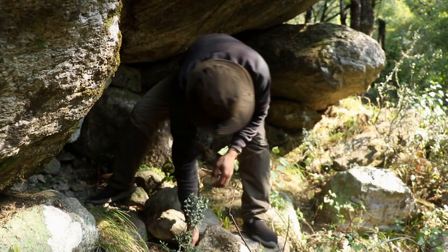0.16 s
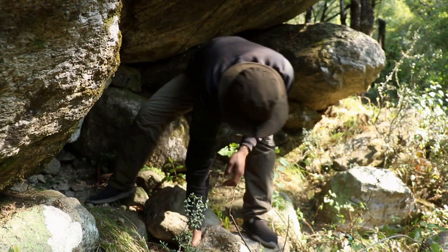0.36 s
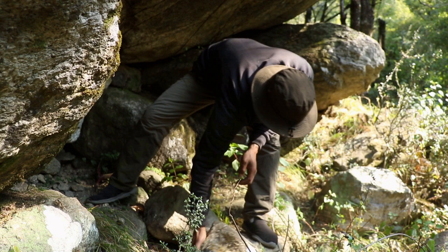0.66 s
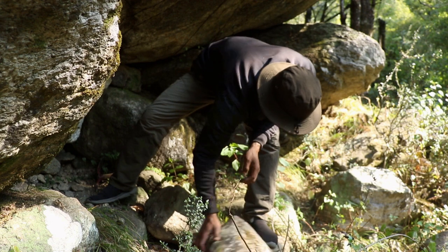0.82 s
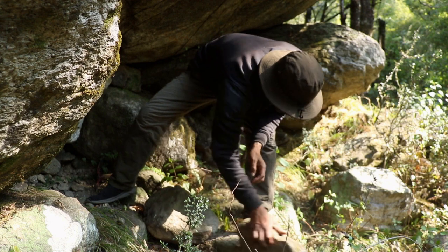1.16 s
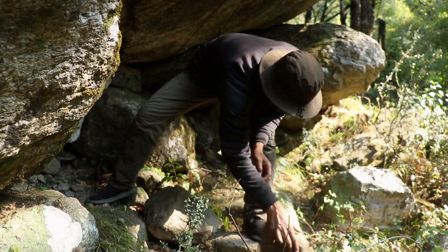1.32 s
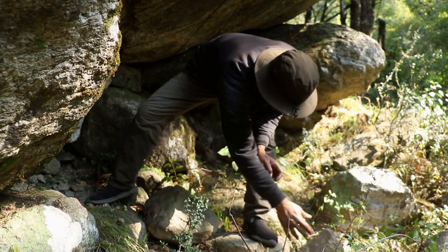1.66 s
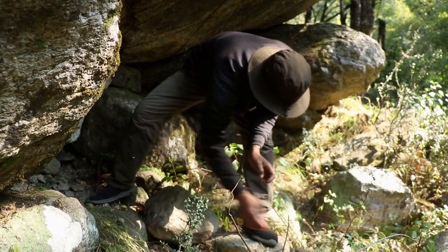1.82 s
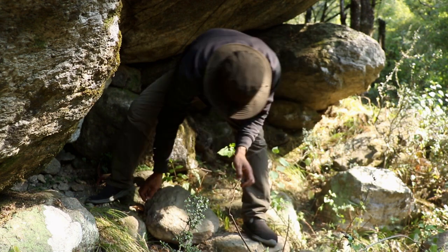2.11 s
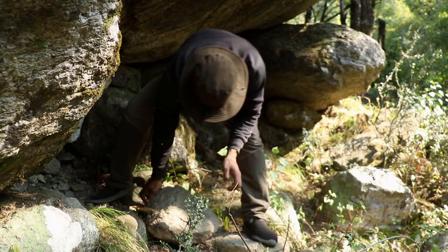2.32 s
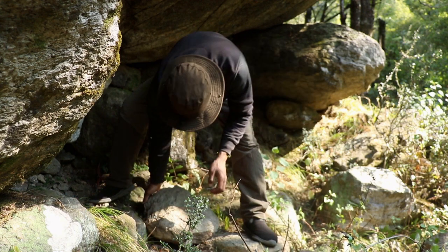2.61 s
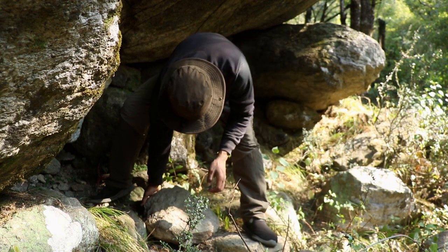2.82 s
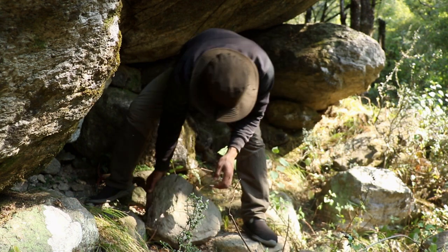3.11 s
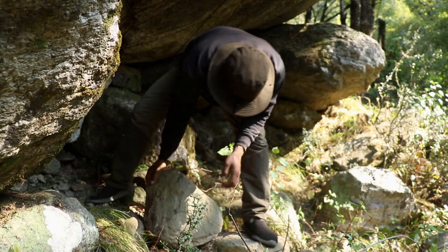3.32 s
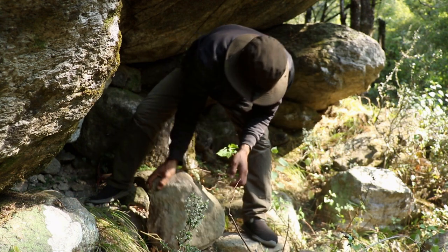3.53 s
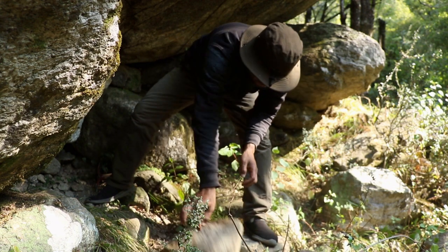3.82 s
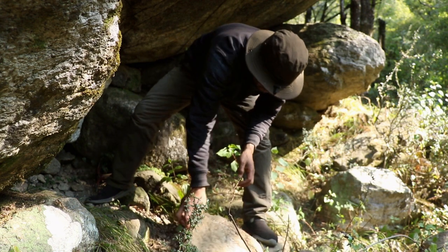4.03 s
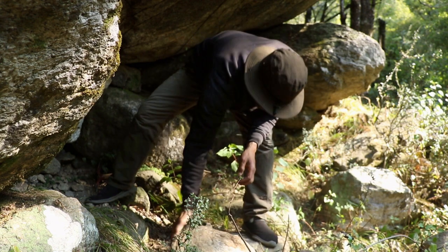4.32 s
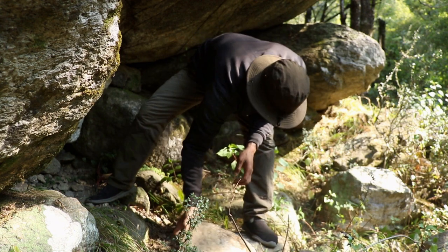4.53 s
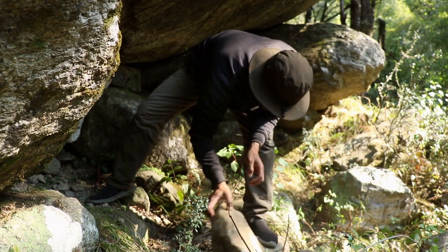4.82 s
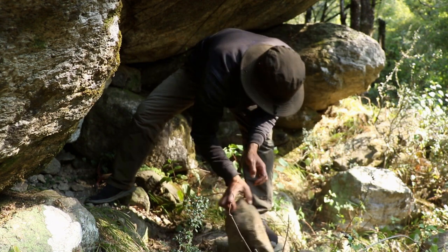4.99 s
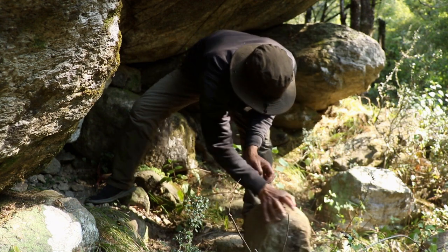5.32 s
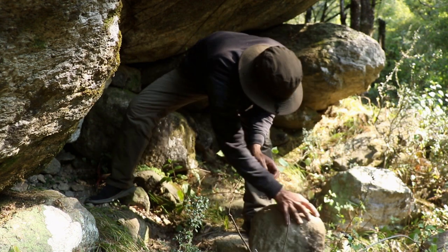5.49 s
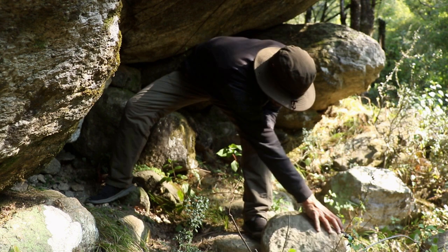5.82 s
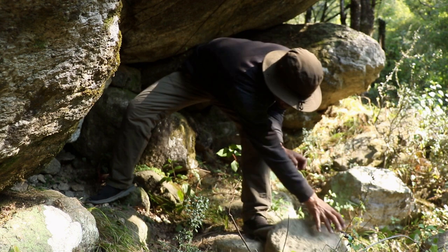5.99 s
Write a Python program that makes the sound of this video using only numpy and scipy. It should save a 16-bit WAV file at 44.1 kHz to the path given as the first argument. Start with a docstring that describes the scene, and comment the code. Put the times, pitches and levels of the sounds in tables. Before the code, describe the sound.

Heavy stones knock, clack and scrape as hands toss and roll them over dry leaves and grit, with twig snaps and one hard stone strike midway.

```python
"""First a faint woodland hush and a few dry twig snaps, then heavy stones are pulled, tossed and rolled by hand.
Each knock layers a dull filtered thud, a hard clack and a low shake of the soil, with noise scattered off boulders.
Small stones ring as they clink, friction impacts make skids, and twigs snap as sharp taps with a splintering tail.
Leaves, grit and a rolling weight are crackling noise that follows the effort of the hands; the sound is mono."""
import sys
import numpy as np
from scipy import signal
from scipy.fft import rfft, irfft, next_fast_len
from scipy.io import wavfile
from scipy.ndimage import uniform_filter1d

SR = 44100
rng = np.random.default_rng(int(sys.argv[2]) if len(sys.argv) > 2 else 0)


def transcribe(signal):
    """Save signal, clipped to [-1, 1], as a 16-bit WAV file at the path in sys.argv[1]."""
    frames = np.atleast_2d(signal).T
    limited = np.clip(frames, -1, 1)
    pcm = np.round(limited * 32767).astype(np.int16)
    wavfile.write(sys.argv[1], SR, pcm)


N = 271215  # samples in the scene
T = np.arange(N) / SR
AGE = np.arange(SR // 4) / SR  # time since a contact began, in s; each contact sound stops at 0.25 s
TAP = (AGE == 0) * 1.0  # single-sample impact


def undb(db):
    """Decibels to gain."""
    return 10 ** (np.asarray(db) / 20)


def unit(x):
    """Scale to rms 1."""
    return x / np.sqrt(np.mean(x ** 2))


def peak(x):
    """Scale to a peak of 1."""
    return x / np.abs(x).max()


def held(x, length_s):
    """Give a burst the energy of an rms-1 sound lasting length_s."""
    return x * np.sqrt(length_s * SR) / np.linalg.norm(x)


def fade(t60_s):
    """Exponential decay over one contact, reaching -60 dB at t60_s."""
    return np.exp(-np.log(1000) * AGE / t60_s)


def band(x, lo_hz, hi_hz, order=2):
    """Causal band-pass, with its edges kept in a workable range."""
    hi_hz = np.clip(hi_hz, 60, 0.47 * SR)
    lo_hz = min(lo_hz, 0.9 * hi_hz)
    sos = signal.butter(order, [lo_hz, hi_hz], "band", fs=SR, output="sos")
    return signal.sosfilt(sos, x)


def colour(x, points):
    """Shape a long sound with a curve of (Hz, dB) points, at rms 1."""
    hz, db = np.transpose(points)
    size = next_fast_len(N, True)
    bins_hz = np.maximum(np.fft.rfftfreq(size, 1 / SR), 1)
    gain = undb(np.interp(np.log(bins_hz), np.log(hz), db))
    return unit(irfft(rfft(x, size) * gain, size)[:N])


def ring(modes):
    """Free ringing of (Hz, dB, t60 s) modes, with unit energy."""
    y = sum(undb(db) * fade(t60_s) * np.cos(2 * np.pi * hz * AGE) for hz, db, t60_s in modes)
    return y / np.linalg.norm(y)


def scatter(t60_s, db):
    """Dense short reflections off the rocks around: noise that swells quickly, then decays."""
    y = rng.standard_normal(len(AGE)) * fade(t60_s) * (1 - fade(0.0098))
    return undb(db) * y / np.linalg.norm(y)


def grains(per_s, spread_db, size):
    """Tiny fractures at random moments: many weak, a few strong."""
    strength = undb(spread_db * np.minimum(rng.exponential(size=size), 4.5))
    breaks = rng.random(size) < per_s / SR
    return unit(breaks * strength * rng.choice([-1, 1], size))


def walk(rate_hz):
    """Random levels drawn rate_hz times a second and joined by slopes."""
    k = max(int(SR / rate_hz), 1)
    steps = np.repeat(rng.standard_normal(N // k + 1), k)
    return uniform_filter1d(steps, k)[:N]


def add(track, start_s, sound):
    """Mix a sound into the track at start_s."""
    i = max(int(start_s * SR), 0)
    track[i:i + len(sound)] += sound[:N - i]


def slide(length_s, rise_s, release_s, per_s):
    """Rough faces catch and slip: dense impacts that die away once the stone stops."""
    onset = 1 - np.exp(-AGE / rise_s)
    release = np.exp(-np.maximum(AGE - length_s, 0) / release_s)
    return onset * release * grains(per_s, 2.0, size=len(AGE))


# Heavy stone knocks; the two pitches set the filter edges in knocks()
# start_s, thud_level_db, thud_pitch_hz, soil_level_db, clack_level_db, clack_pitch_hz
STONE_KNOCKS = [(1.008, -40, 280, -35.5, -59, 1500), (1.076, -27, 310, -41.5, -41, 1200),
                (1.274, -39.5, 260, -56, -36, 1500), (1.644, -25.5, 467, -44.5, -22, 3970),
                (1.658, -29.5, 476, -54, -38, 3000), (1.798, -18, 323, -24.5, -16, 1130),
                (1.811, -22.5, 383, -45, -50, 1200), (1.869, -31.5, 259, -31, -54, 1200),
                (1.917, -27.5, 420, -46, -23.5, 2220), (1.927, -23.5, 243, -62, -18.5, 1200),
                (2.028, -21.5, 680, -62, -29, 1300), (2.202, -14, 324, -32, -39, 1300),
                (2.214, -23, 397, -56, -26.5, 1460), (3.065, -45.5, 283, -52.5, -49, 2000),
                (3.617, -47.5, 237, -47.5, -52, 1500), (3.714, -46, 247, -54, -65, 1500),
                (3.87, -32.5, 246, -45, -58, 1500), (3.993, -24.5, 400, -56, -38.5, 1200),
                (4.005, -17, 220, -29, -21, 2780), (4.0078, -7.5, 439, -27.5, -5.5, 1330),
                (4.044, -41, 600, -56, -25, 980), (4.25, -31.5, 324, -49, -45.5, 1200),
                (4.33, -40.5, 300, -57, -50.5, 1200), (4.435, -28, 417, -47, -33, 900),
                (4.477, -20.5, 351, -32.5, -35.5, 1470), (4.576, -60, 298, -52, -36, 960),
                (4.695, -48.5, 333, -47, -51.5, 1200), (4.721, -38, 289.5, -49, -49, 990),
                (5.102, -46.5, 260, -61.5, -55, 1190), (5.33, -45, 260, -63, -45, 1500),
                (5.423, -49.5, 255.5, -48, -62, 1200), (5.736, -42.5, 270, -49.5, -44, 1500)]
# Ring of a boulder on its bed: pitch_hz, relative_level_db, t60_s
BOULDER_MODES = [(213, -8.5, 0.073), (447, 3, 0.06), (785, -8, 0.11), (1045, -3.5, .05), (1090, 2, 0.043),
                 (1320, -26, 0.031), (1810, 2, .05), (2220, 5, .04), (2850, 15, 0.0092)]
SOIL_HZ, SOIL_T60_S = 119.4, 0.15


def knocks(rows):
    """The stopped mass thuds, the hard contact clacks, and the soil shakes on."""
    out = np.zeros(N)
    soil = peak(np.sin(2 * np.pi * SOIL_HZ * AGE) * fade(SOIL_T60_S) * (1 - fade(0.02)))
    body = TAP + undb(-11) * ring(BOULDER_MODES)
    for start_s, thud_db, thud_hz, soil_db, clack_db, clack_hz in rows:
        thud = band(body + scatter(0.071, -1.5), thud_hz / 1.97, thud_hz * 1.213, order=3)
        clack = band(body + scatter(0.043, -1), 650, clack_hz * 1.163)
        sound = undb(thud_db) * held(thud, 0.0032)
        sound = sound + undb(clack_db) * held(clack, 0.00081)
        add(out, start_s, sound + undb(soil_db) * soil)
    return out


JUDDER_START_S, JUDDER_END_S = 2.045, 2.185
JUDDER_PER_S, JUDDER_UNEVEN = 50, 0.17  # random timing spread as a share of the bump spacing
JUDDER_DB, JUDDER_FADE_DB_PER_S = -29.5, 54  # thud level of the first bump and its loss
JUDDER_HZ, JUDDER_SAG_HZ_PER_S = 590, 630  # thud pitch of the first bump and its drop
JUDDER_CLACK_DB, JUDDER_SOIL_DB = -4, -37  # relative to each thud
JUDDER_CLACK_SPREAD_DB, JUDDER_CLACK_HZ = 4, 2090


def judder():
    """A tossed stone slides in quick uneven bumps, their thuds ever weaker and deeper; rows for knocks()."""
    rows = []
    for age in np.arange(0, JUDDER_END_S - JUDDER_START_S, 1 / JUDDER_PER_S):
        late, hard = rng.standard_normal(2)
        start_s = JUDDER_START_S + age + JUDDER_UNEVEN * late / JUDDER_PER_S
        thud_db = JUDDER_DB - JUDDER_FADE_DB_PER_S * age
        thud_hz = JUDDER_HZ - JUDDER_SAG_HZ_PER_S * age
        clack_db = thud_db + JUDDER_CLACK_DB + JUDDER_CLACK_SPREAD_DB * hard
        rows.append((start_s, thud_db, thud_hz, thud_db + JUDDER_SOIL_DB, clack_db, JUDDER_CLACK_HZ))
    return rows


# Small hard stones chattering: start_s, length_s, level_db, pitch_ratio (to the pebble below)
STONE_CLINKS = [(1.46, 0.012, -47.5, 1.17), (1.867, 0.0069, -28, 0.99), (1.876, 0.017, -35, 1.07),
                (1.912, 0.0027, -33.5, 0.62), (2.262, 0.0039, -57, 1.72), (2.313, 0.0034, -56, 1.7),
                (3.04, 0.014, -50.5, 1.08), (3.768, 0.0071, -48, 0.68), (3.79, 0.023, -52.5, .95),
                (3.899, 0.0031, -43, 0.97), (3.984, 0.0014, -36, 1.08)]
# Ring of the reference pebble: pitch_hz, relative_level_db, t60_s
PEBBLE_MODES = [(1910, -1.5, 0.035), (2207, 8.5, 0.043), (2430, -6, .03), (2750, -2.5, .055),
                (2705, 8.5, 0.096), (2930, -0.5, 0.018), (3510, -5, 0.066), (4270, -10, 0.076),
                (5400, -3.5, .04), (6200, -7.5, 0.034), (7550, -10, .04)]


def clinks():
    """A first tap and a chatter of contacts ring a small stone; smaller stones ring higher and shorter."""
    out = np.zeros(N)
    for start_s, length_s, db, pitch in STONE_CLINKS:
        contacts = 24 * TAP + slide(length_s, 0.00056, 0.0018, per_s=6000)
        modes = [(hz * pitch, mode_db, t60_s / pitch ** 2) for hz, mode_db, t60_s in PEBBLE_MODES]
        stone = ring(modes) + 0.29 * TAP
        sound = band(signal.fftconvolve(contacts, stone), 1600 * pitch, 7000 * pitch)
        add(out, start_s, undb(db) * held(sound, length_s))
    return out


# Twig snaps placed one by one: start_s, level_db (over the first 0.7 ms), centre_hz
TWIG_SNAPS = [(0.1421, -42.5, 6900), (0.3529, -38, 6850), (0.4598, -41.5, 6450), (0.7958, -35, 7140),
              (0.8634, -29, 4700), (0.8757, -32.5, 3730), (0.9772, -29.5, 3400), (1.0996, -18.5, 10000),
              (1.1518, -25, 11100), (1.1621, -28, 3480), (1.2433, -29, 9200), (1.4157, -25, 6440),
              (1.727, -36, 3370), (1.7689, -32, 4600), (1.8655, -30, 3070), (2.3436, -46, 2580),
              (2.4034, -49.5, 10100), (3.0621, -33.5, 3930), (3.0932, -40.5, 3200), (3.1425, -39, 3450),
              (3.1856, -42, 5900), (3.607, -38, 8860), (3.9249, -33, 6460), (4.1492, -35.5, 6040),
              (5.0874, -40, 4540), (5.11, -37, 8550), (5.2537, -39, 2580)]


def snaps(rows):
    """Dry stems break with one sharp crack, a brief ring of their own and a splintering tail."""
    out = np.zeros(N)
    for start_s, db, hz in rows:
        octaves = rng.uniform(-0.81, 1, size=8)
        stem = ring([(min(hz * 2 ** octave, SR / 3), 0, 0.025) for octave in octaves])
        crack = TAP + scatter(0.01, 3.1) + scatter(0.081, 0) + undb(-9.5) * stem
        crack = band(crack, hz / 2.77, hz * 2.18, order=1)
        add(out, start_s, undb(db) * held(crack, 0.0007))
    return out


TWIGS_PER_S, TWIG_HZ = 27, 5960  # pitch varies by up to an octave either way
TWIG_OVER_LEAVES_DB, TWIG_SPREAD_DB = 8.5, 5.5  # spread is the most either way


def twigs():
    """Small stems caught by the moving stone break at random, as loud as the leaves allow; rows for snaps()."""
    when, size, pitch = rng.uniform(0, 1, size=(int(TWIGS_PER_S * N / SR), 3)).T
    start_s = when * N / SR
    leaves_db, _ = effort(start_s)
    db = leaves_db + TWIG_OVER_LEAVES_DB + TWIG_SPREAD_DB * (2 * size - 1)
    return zip(start_s, db, TWIG_HZ * 2 ** (2 * pitch - 1))


# Short skids over stone and through leaves: start_s, length_s, level_db, low_edge_hz, high_edge_hz
STONE_SKIDS = [(0.337, 0.11, -58.5, 2470, 10400), (1.009, 0.1, -48.5, 100, 396),
               (1.263, 0.024, -49.5, 507, 1970), (1.54, 0.049, -45.5, 586, 6040),
               (1.867, 0.031, -38.5, 130, 472), (1.868, 0.025, -37, 1900, 3530),
               (1.912, 0.024, -29, 428, 2220), (1.916, 0.027, -34.5, 3000, 11900),
               (3.082, 0.13, -58, 109, 417), (3.295, 0.049, -56, 5000, 12000),
               (3.355, 0.039, -57.5, 100, 288), (3.631, 0.061, -50, 3970, 13000),
               (3.659, 0.028, -41, 4960, 13400), (3.763, 0.032, -57, 1300, 4160),
               (3.884, .1, -55, 120, 420), (4.03, 0.029, -39, 90, 300), (4.067, 0.068, -52, 600, 2900),
               (4.391, 0.065, -55, 2000, 11800), (5.268, 0.13, -59.5, 100, 507),
               (5.719, 0.17, -68.5, 129, 598)]


def skids():
    """Short slides, deep on bare stone and bright through leaves; long ones swell in gently."""
    out = np.zeros(N)
    for start_s, length_s, db, lo_hz, hi_hz in STONE_SKIDS:
        rub = slide(0.82 * length_s, 0.11 * length_s, 0.29 * length_s, per_s=4000)
        add(out, start_s, undb(db) * held(band(rub, lo_hz, hi_hz), length_s))
    return out


# Steady handling, before the trims below: time_s, dry_leaves_level_db, grinding_grit_level_db
HAND_EFFORT = [(0, -80, -74), (0.62, -72.5, -70.5), (0.76, -57.5, -65.0), (0.95, -51.5, -66),
               (1.17, -48.5, -53.5), (1.33, -56.0, -66.5), (1.57, -52.5, -56.5), (1.73, -60.5, -63),
               (1.97, -48, -46.5), (2.17, -54, -53.5), (2.33, -69.5, -67.5), (2.56, -75.5, -75),
               (2.98, -80.5, -74.5), (3.08, -65.5, -64), (3.54, -61.5, -68.0), (3.74, -55.5, -58.5),
               (3.97, -53.5, -64), (4.12, -46, -55.0), (4.3, -62, -67.5), (4.53, -66, -72.5),
               (4.78, -58.5, -65), (4.901, -63.5, -68), (5.26, -54.5, -63), (5.45, -63.5, -73),
               (5.84, -61.5, -57), (5.98, -67.5, -78.5), (6.1, -59, -53)]
LEAVES_TRIM_DB, GRIT_TRIM_DB = 1.5, 1


def effort(time_s):
    """The hands' effort sets the levels of the leaves and the grit, in dB."""
    times_s, leaves_db, grit_db = np.transpose(HAND_EFFORT)
    leaves_now_db = np.interp(time_s, times_s, leaves_db) + LEAVES_TRIM_DB
    grit_now_db = np.interp(time_s, times_s, grit_db) + GRIT_TRIM_DB
    return leaves_now_db, grit_now_db


SETTLE_DB, SETTLE_T60_S = -38.5, 0.49


def settling():
    """The stone settles into its bed after each knock: a dying rumble, growing as the root of the thud."""
    power = np.zeros(N)
    for start_s, thud_db, *_ in STONE_KNOCKS:
        add(power, start_s, undb(thud_db) * fade(SETTLE_T60_S) ** 2)
    return undb(SETTLE_DB) * np.sqrt(power)


def crackle(per_s, spread_db, t60_s):
    """Countless tiny breaks, each its own short burst of noise."""
    decay = np.exp(-2 * np.log(1000) / (t60_s * SR))  # of power, per sample
    power = signal.lfilter([1], [1, -decay], grains(per_s, spread_db, size=N) ** 2)
    return np.sqrt(power + 1e-12) * rng.standard_normal(N)


def shifting(x, rate_hz, depth_db):
    """The colour changes as new leaves and new faces of stone take the load."""
    out, rest = 0, x
    for hz in 750 * 2 ** np.arange(5):  # octave bands peeled off from the bottom up
        low = signal.sosfiltfilt(signal.butter(2, hz, fs=SR, output="sos"), rest)
        out = out + low * undb(depth_db * walk(rate_hz))
        rest = rest - low
    return unit(out + rest)


def chips(count, t60_s, spread_db):
    """Loose chips tick against each other, each at its own pitch."""
    out = np.zeros(N)
    age = AGE[:SR // 25]
    for when, size, strength in rng.random((count, 3)):
        hz = 900 * 5 ** size
        tick = np.sin(2 * np.pi * hz * age) * fade(t60_s)[:len(age)]
        gain = undb(-spread_db * np.log(max(strength, 0.03)))  # few strong ticks
        add(out, when * N / SR, gain * tick)
    return unit(out)


def ground_echo(x, mean_lag_s, share):
    """The bounce off the ground arrives a little late and sweeps as the hand moves."""
    lag_s = mean_lag_s * (1 + 0.23 * walk(4))
    return unit(x + share * np.interp(T - lag_s, T, x))


# Tone of the dry leaves: pitch_hz, level_db
LEAVES_TONE = [(600, -11.5), (1500, -11.5), (3000, -1), (5000, -2.5), (8000, 1), (12000, -3.5),
               (14500, -8.5), (16000, -19)]
# Tone of the grinding grit: pitch_hz, level_db
GRIT_TONE = [(200, -38), (500, 3), (900, 3), (1800, 4.5), (3000, -2), (6000, -8), (16000, -41.5)]
# Tone of the rolling weight: pitch_hz, level_db
ROLLING_TONE = [(25, -29.5), (60, -7.5), (125, -3.5), (250, -8.5), (480, -13), (800, -24.5), (3000, -49)]
ROLL_DB = -7  # relative to the grit


def handling():
    """Leaves crackle, grit grinds and the stone's weight rumbles, louder as the grit grinds harder."""
    leaves_db, grit_db = effort(T)
    jerks = walk(45)  # the stone moves in small fits
    leaves = shifting(colour(crackle(1100, 2.72, 0.034), LEAVES_TONE), 22, 0.92)
    leaves = ground_echo(leaves, 0.0013, share=0.33)
    grit = shifting(colour(crackle(900, 0.89, 0.013), GRIT_TONE), 28, 2.9)
    grit = grit + undb(-12.5) * chips(count=900, t60_s=0.014, spread_db=6.5)
    weight = colour(crackle(420, 1.9, 0.057), ROLLING_TONE) * undb(5.9 * walk(15))
    weight_gain = np.hypot(undb(grit_db + ROLL_DB), settling())
    return (leaves * undb(leaves_db + 1.1 * jerks)
            + grit * undb(grit_db + 1.9 * jerks)
            + weight * weight_gain)


# Tone of the woodland hush: pitch_hz, level_db
HUSH_TONE = [(18, -55), (30, -25), (121, -20), (194, -13), (233, -8), (374, -5), (473, -5.5), (844, -8.5),
             (988, -9), (1810, -26), (1960, -25.5), (2170, -20.5), (16000, -32)]
HUSH_DB = -68.5


def woodland():
    """Air and far foliage make a faint even hush of coloured noise."""
    return undb(HUSH_DB) * colour(rng.standard_normal(N), HUSH_TONE)


def scene():
    """All sources reach one microphone, alike in both channels."""
    stones = knocks(STONE_KNOCKS) + knocks(judder()) + clinks() + skids()
    stems = snaps(TWIG_SNAPS) + snaps(twigs())
    mono = stones + stems + handling() + woodland()
    return np.array([mono, mono])


def record(dry):
    """The recorder thins the deep bass and cuts the top."""
    thinned = signal.sosfilt(signal.butter(2, 45, "high", fs=SR, output="sos"), dry)
    top_cut = signal.ellip(10, 0.2, 80, 15800, fs=SR, output="sos")  # steep low-pass at 15.8 kHz
    return signal.sosfilt(top_cut, thinned)


dry = scene()
out = record(dry)
transcribe(out)
```